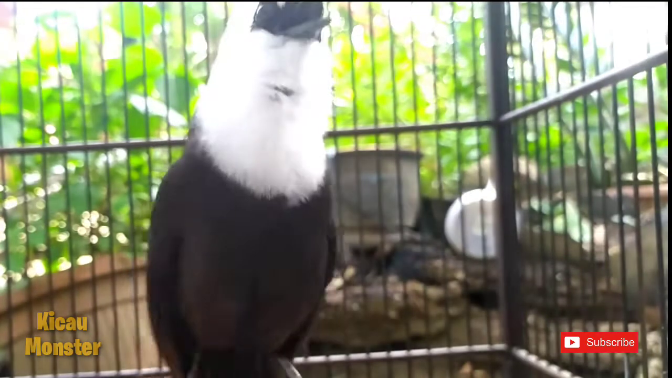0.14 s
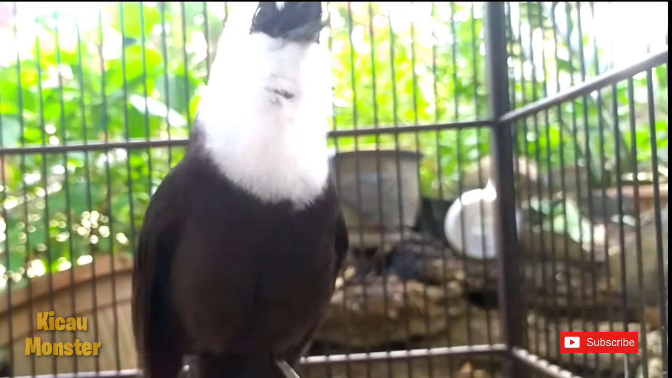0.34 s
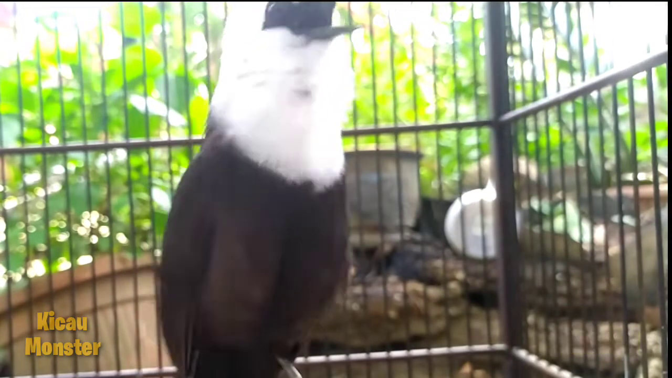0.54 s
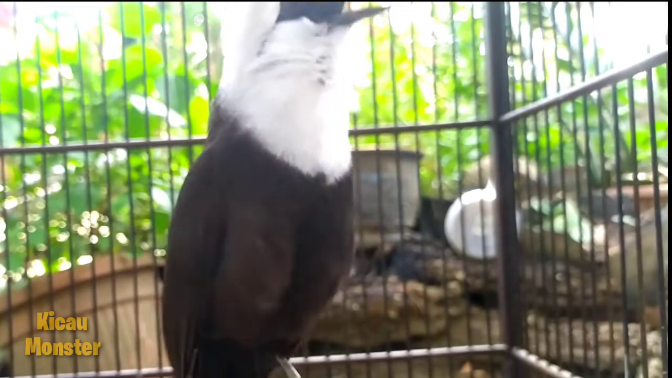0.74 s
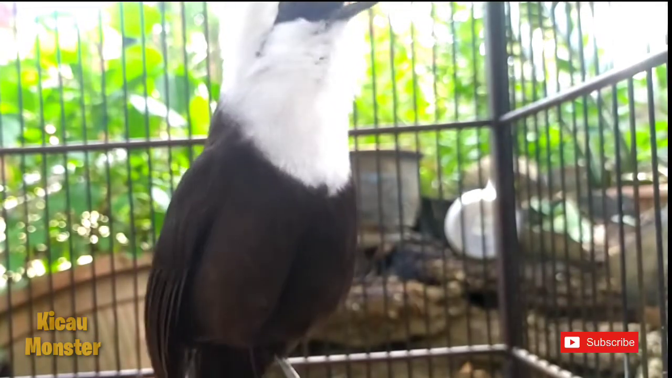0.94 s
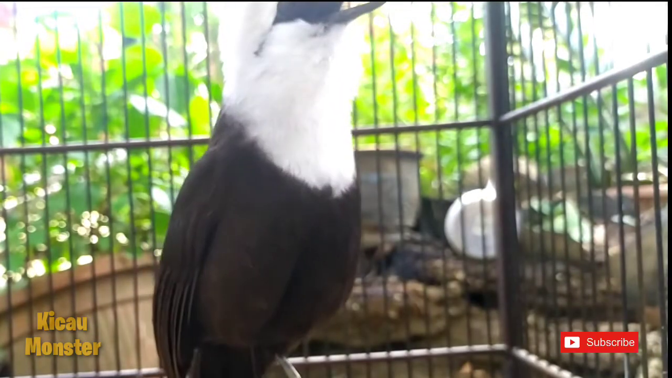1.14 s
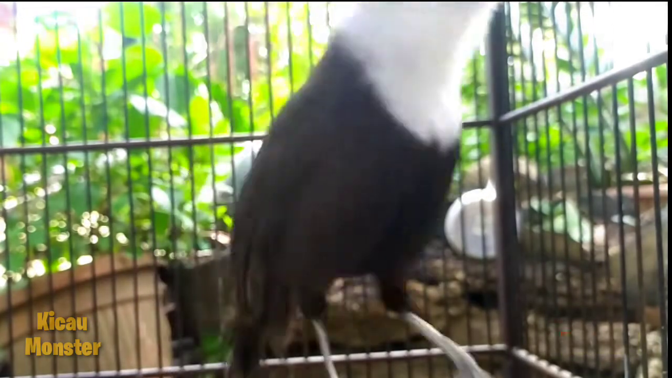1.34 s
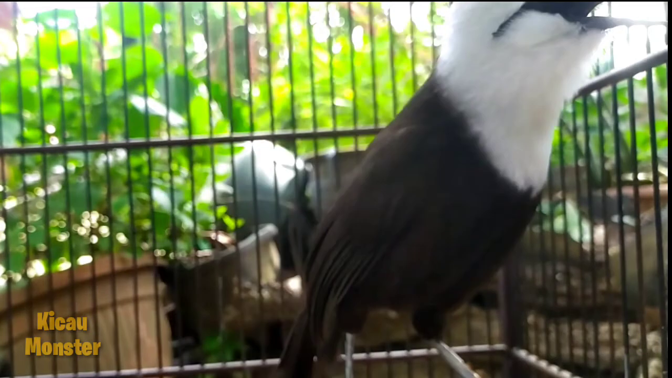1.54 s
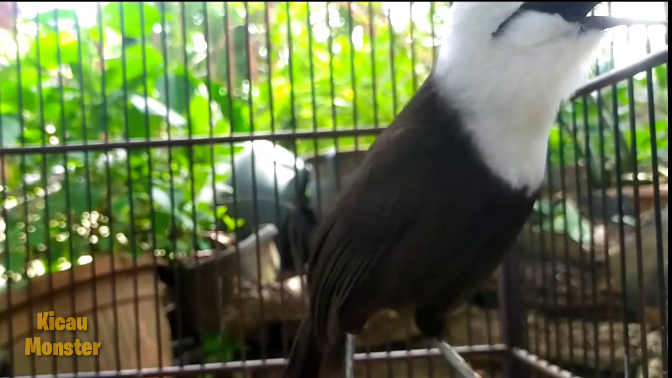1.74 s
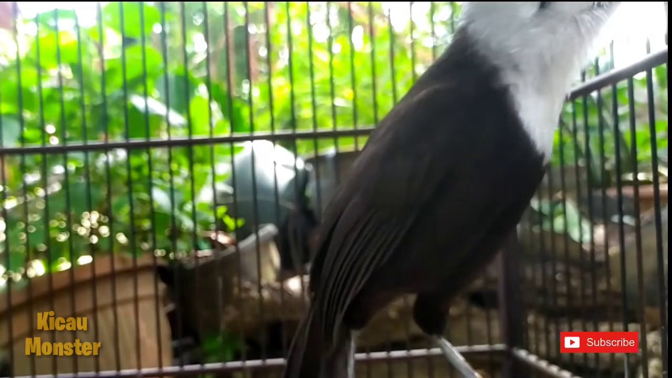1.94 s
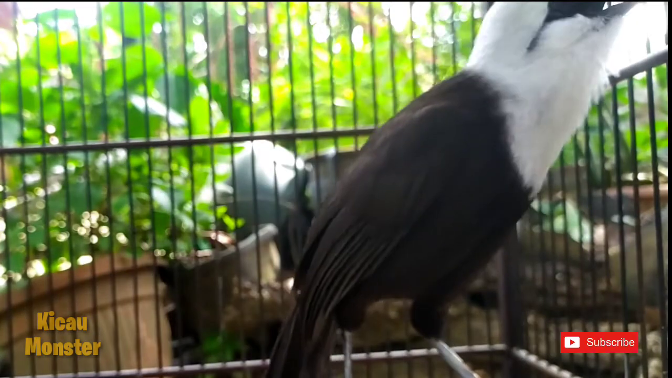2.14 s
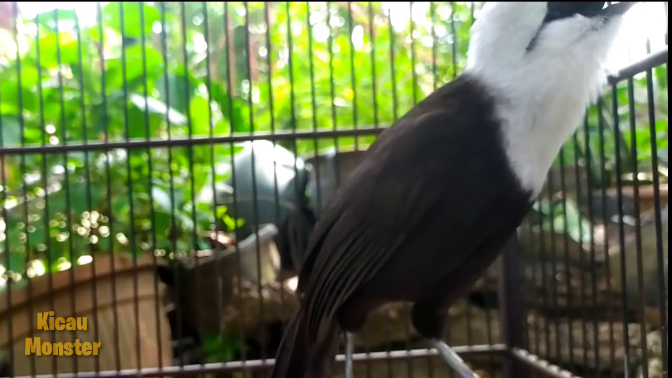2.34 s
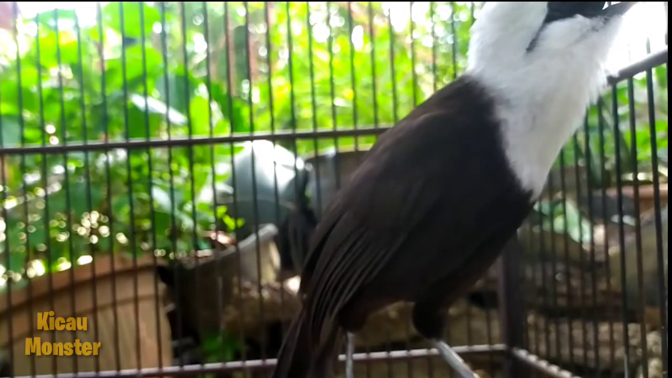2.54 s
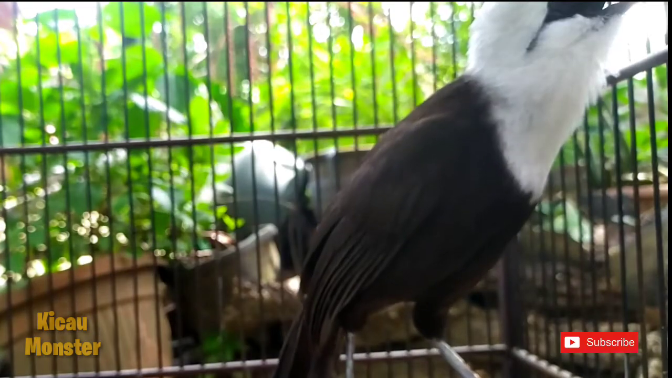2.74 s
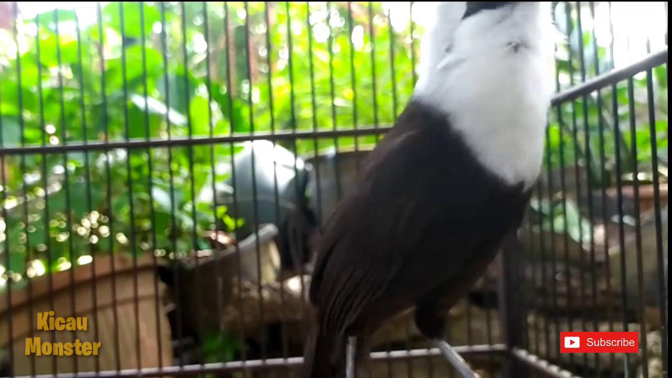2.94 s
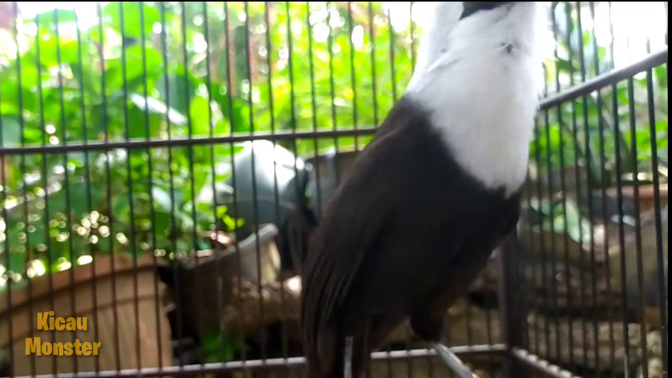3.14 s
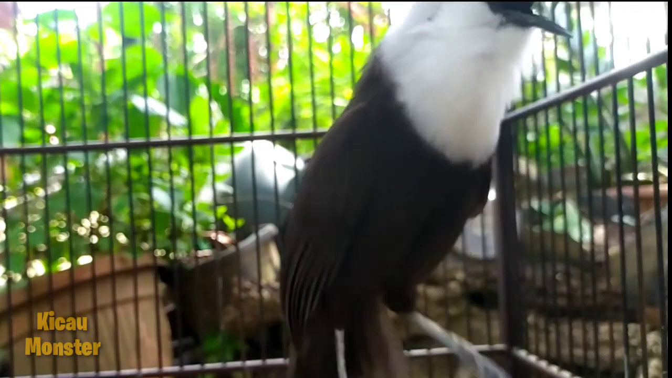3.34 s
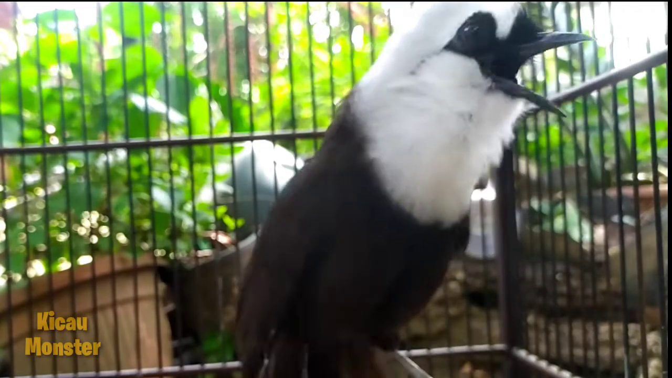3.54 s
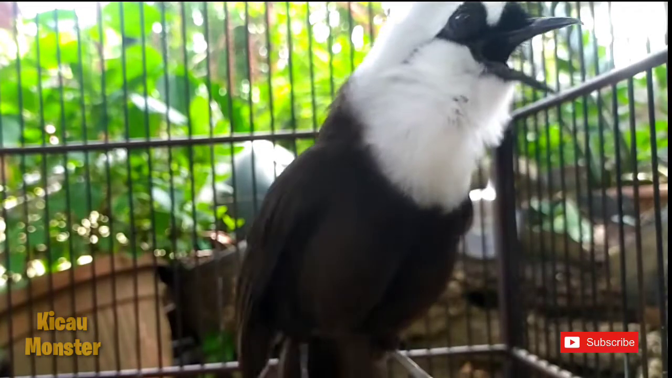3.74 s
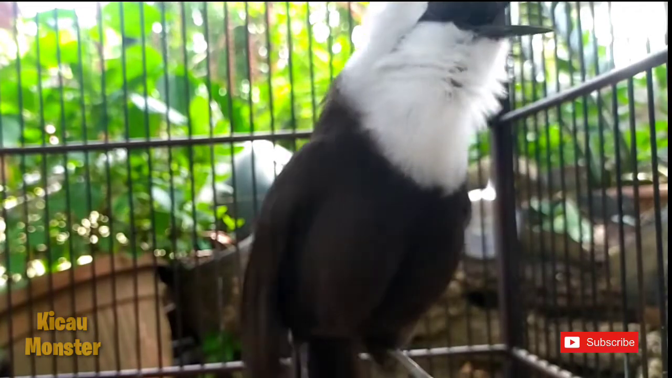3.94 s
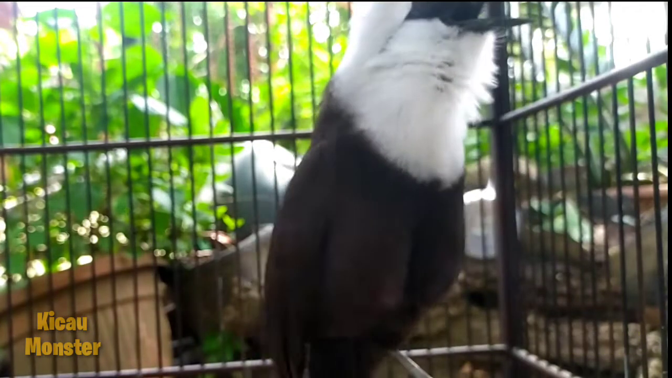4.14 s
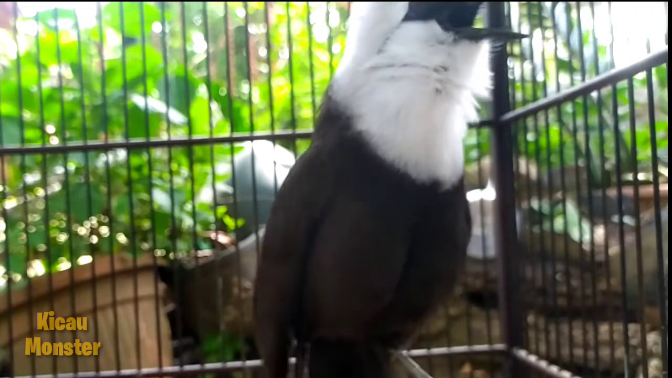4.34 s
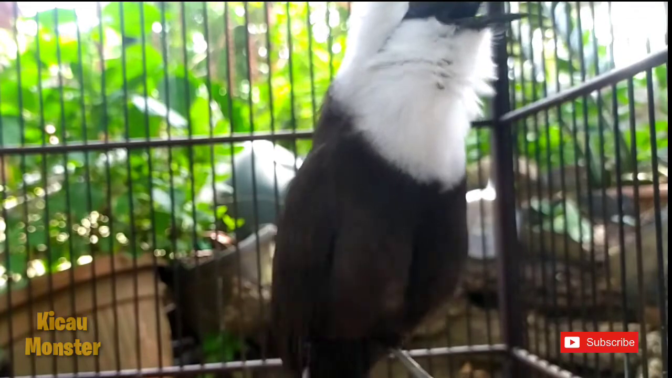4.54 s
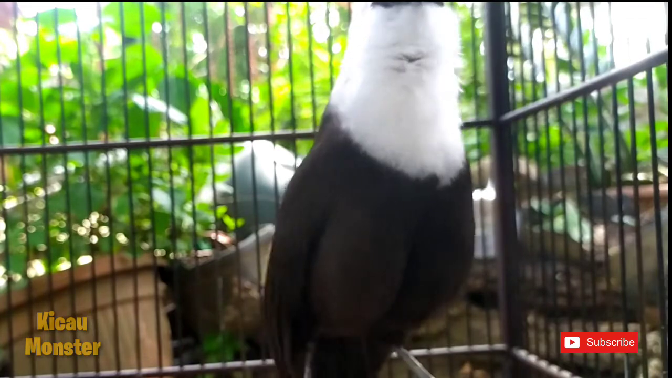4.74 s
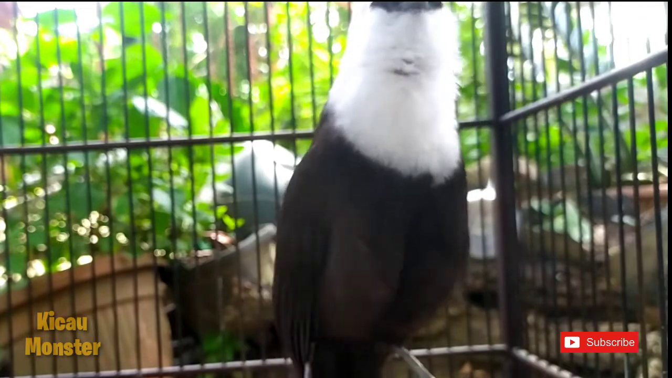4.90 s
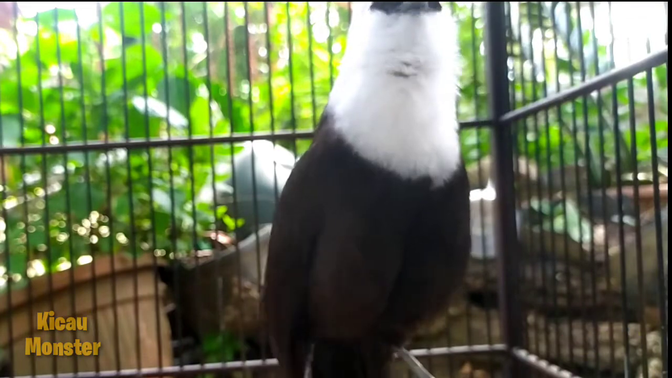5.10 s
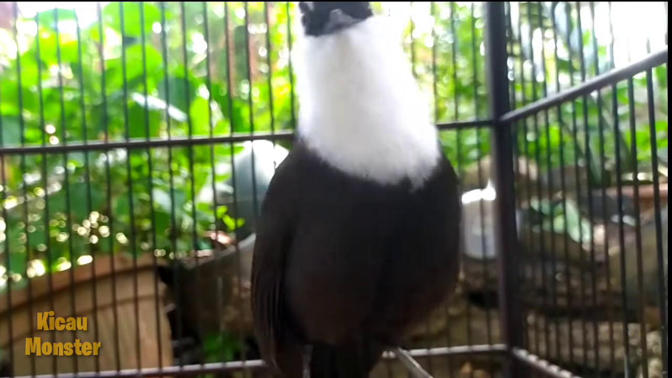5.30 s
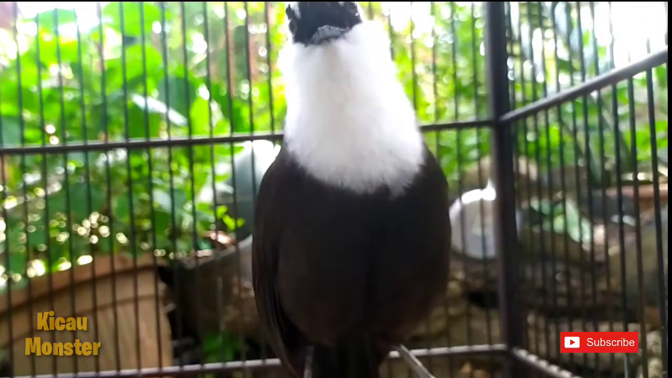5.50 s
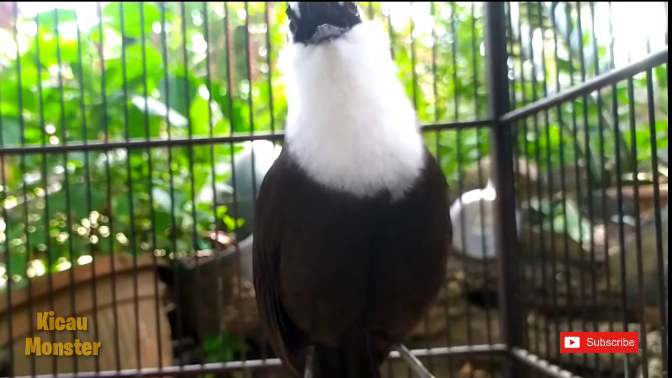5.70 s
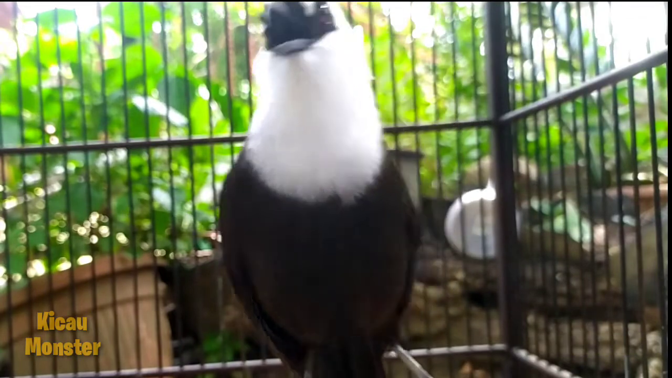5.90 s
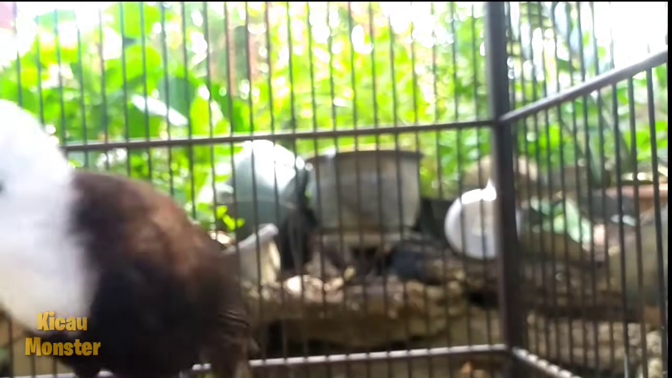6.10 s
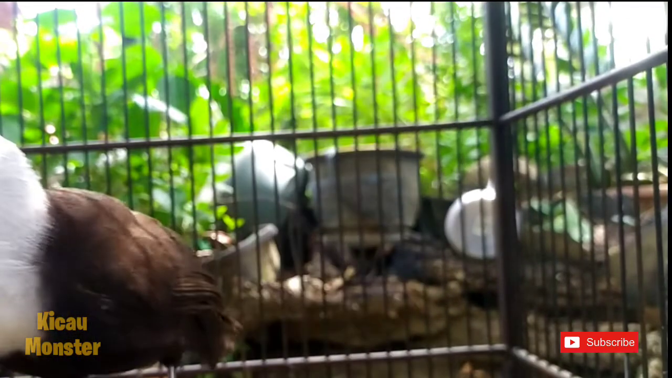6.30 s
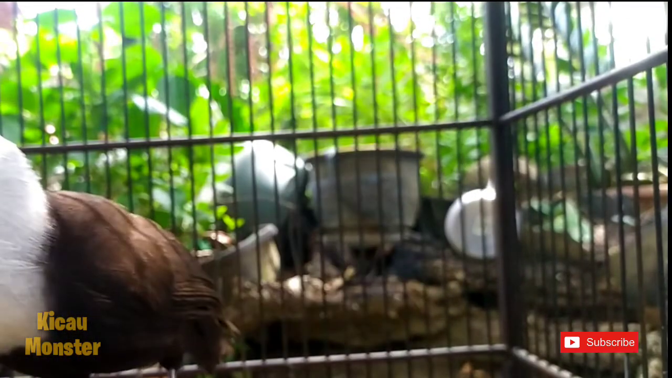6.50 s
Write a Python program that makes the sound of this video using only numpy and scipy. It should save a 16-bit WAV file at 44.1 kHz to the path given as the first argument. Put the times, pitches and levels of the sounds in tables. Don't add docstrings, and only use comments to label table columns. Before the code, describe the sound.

Outdoors in a garden, a large songbird chatters loudly right at the microphone: eleven quick raspy notes, slowing slightly, then a pause with weak echoing sparrow chirps over faint hum and rumble. Quiet stray notes lead to a short wobbling call and over two seconds of dense machine-like rattling, with a bright, slightly overloaded edge. It stops; claws tick, thin low whistles catch and settle, and a rough little squawk ends it.

```python
import sys
import numpy as np
from scipy import signal
from scipy.fft import rfft, irfft, next_fast_len
from scipy.io import wavfile
from scipy.ndimage import uniform_filter1d, map_coordinates

SR = 44100
rng = np.random.default_rng(int(sys.argv[2]) if len(sys.argv) > 2 else 0)


def field_ratio(decibels):
    return 10 ** (np.asarray(decibels, dtype=float) / 20)


def store_pcm(level_fs):
    pcm = np.round(np.clip(level_fs, -1, 1) * 32767).astype(np.int16)
    wavfile.write(sys.argv[1], SR, np.atleast_2d(pcm).T)


N = 293706
TIME = np.arange(N) / SR

# (time [s], level [dB], opening pitch of the ruling partial [Hz])
FIRST_BURST = [(0.01, 0, 1903), (0.085, -3, 1871), (0.161, -0.5, 1868), (0.243, -2, 1848),
               (0.333, -1.5, 1889), (0.413, -1, 1868), (0.496, -2, 1868), (0.582, -3, 1855),
               (0.679, -4, 1849), (0.771, -4.5, 1809), (0.895, -5, 1804)]
# (time [s], level [dB], opening pitch [Hz])
SECOND_BURST = [(3.136, -7, 1831), (3.245, -2.5, 1903), (3.323, -2, 1898), (3.389, -1.5, 1938),
                (3.456, -4.5, 1992), (3.525, -4, 1905), (3.594, -2, 1940), (3.663, -2.5, 1907),
                (3.734, -2, 1879), (3.805, -1.5, 1884), (3.875, -1.5, 1912), (3.945, -1.5, 1855),
                (4.017, -1.5, 1922), (4.089, -1.5, 1889), (4.161, -1.5, 1868), (4.238, -1, 1869),
                (4.314, -0.9, 1876), (4.396, -3, 1816), (4.478, -3, 1817), (4.564, -2.5, 1838),
                (4.654, -2.5, 1858), (4.745, -4, 1888), (4.847, -2, 1902), (4.948, -3.5, 1778),
                (5.063, -2.5, 1825), (5.163, -3.5, 1836), (5.254, -4.5, 1811)]
# (time [s], length [s], level [dB], opening pitch [Hz])
SOFT_NOTES = [(2.508, 0.034, -43, 1792), (2.56, .024, -41.5, 1767), (2.617, 0.023, -38, 1834),
              (2.684, 0.027, -36, 1884), (2.764, .028, -39, 1880), (2.846, 0.025, -34.5, 1841),
              (5.461, .03, -38.5, 1812)]
NOTE_BEND = [(.2, 0), (.63, .27), (.75, 1.05), (.87, .3), (1.0, 0)]
# (share of note, level [dB], rasp [dB], second voice [dB])
NOTE_SWELL = [(-.3, -43, -10, -61.5), (-.2, -27.5, -15, -59.5), (-.06, -20, -11.5, -61.5),
              (.05, 0.5, -30, -60.5), (.72, -1.5, -23.5, -18), (.94, 0, -22.5, -20),
              (1.1, -27, -0.5, -13.5), (1.28, -29, 5.5, -24), (1.5, -53, 0, -47)]
# (time [s], pitch [Hz], level [dB])
LONG_NOTE = [(2.878, 1251, -47), (2.898, 1566, -21), (2.917, 1657, -11), (2.942, 1503, -17.5),
             (2.968, 1583, -12.5), (2.993, 1500, -15), (3.016, 1700, -6.5), (3.027, 1628, -7),
             (3.042, 1250, -39)]
# (frequency [Hz], level [dB])
THROAT = [(700, -30), (1000, -32.5), (2400, -22.5), (3200, -33), (3800, -38), (4700, -37.5), (5600, -19.5),
          (6600, -30), (8400, -35), (9400, -27.5), (10800, -25.5), (12300, -43.5), (14200, -35)]
# (frequency [Hz], density [dB per Hz])
RASP = [(3500, -46), (4600, -10), (5600, 11.5), (7200, -17), (8400, -4), (10200, -1), (12300, -3.5),
        (14200, -7), (16000, -22)]
# (frequency [Hz], density [dB per Hz])
WHEEZE = [(5200, -52.5), (6200, -17), (7100, 5), (8000, -3.5), (9500, -24), (11500, -2.5), (15000, -13),
          (16000, -42)]
# (frequency [Hz], density [dB per Hz])
GRUFF = [(300, -59), (600, -36.5), (1000, -3), (1350, -3), (1900, 6.5), (2800, -4.5), (3800, -12.5),
         (5000, -41)]
# (centre [Hz], width [Hz], depth [0-1])
NOTCHES = [(4300, 190, 0.1), (8385, 150, 1), (12200, 630, 0.8)]
# (time [s], opening [dB], slackness of the throat [dB])
BEAK = [(0, 2.5, 0.64), (.95, 0, -0.6), (2.49, -26, 10), (2.87, -10.5, -5), (2.89, -21, 7.5),
        (3.04, -22, 0.5), (3.13, -19.5, -0.5), (3.27, -6.5, -3.5), (3.45, 4.5, 3), (4.0, 3.5, -0.1),
        (4.6, 1.7, -1.4), (5.3, -1.54, -2), (5.5, 1, -2)]
# (time [s], left lag [samples], left-right [dB])
POSE = [(0, 5.5, -2.8), (.95, 5.5, -2), (2.42, 5, -2.5), (2.49, 20, 3), (2.87, 16, -3), (2.89, 9.5, -8),
        (3.13, 10.5, -1.5), (3.45, 11.5, -6), (4.6, 10.5, -7), (5.3, 7.5, 0), (6.2, 12.5, 0.2),
        (6.595, 11.5, 1.5), (6.6, -3.5, 4)]
# (time [s], length [s], from [Hz], to [Hz], level [dB])
WHISTLES = [(2.15, 0.16, 1496, 1430, -63), (2.294, 0.0956, 1365, 1290, -57.5),
            (5.94, .06, 1370, 1380, -62.5), (6.17, .045, 1246, 1280, -48),
            (6.206, 0.032, 1318, 1290, -39.5), (6.256, .17, 1289, 1314, -40), (6.429, .07, 1353, 1384, -40)]
# (time [s], length [s], from [Hz], to [Hz], level [dB])
HELD_WHISTLE = (6.49, .125, 1394, 1391, -38)
# (time [s], level [dB])
SQUAWK_SWELL = [(6.602, -49), (6.61, -27), (6.63, -15), (6.645, -23.5), (6.66, -37.5)]
# (frequency [Hz], density [dB per Hz])
SQUAWK_COLOUR = [(240, -72), (400, -58), (1010, -8.5), (1760, -12), (2930, -15), (3690, -28), (3990, -27),
                 (4380, -26.5), (5780, -21), (13100, -27.5), (16000, -33)]
# (time [s], pitch [Hz], level [dB])
SQUAWK_SLIDE = [(6.604, 2800, -39), (6.614, 2529, -26.5), (6.62, 2078, -26.5), (6.625, 1250, -18),
                (6.629, 1592, -14.5), (6.634, 2064, -15.5), (6.639, 1571, -22.5), (6.646, 1186, -21.5),
                (6.659, 1000, -40)]
# (time [s], length [s], from [Hz], to [Hz], level [dB])
CHEEPS = [(1.181, 0.017, 4700, 2800, -39.5), (1.324, 0.024, 4930, 2990, -41),
          (2.34, .033, 2560, 3340, -50.5), (2.583, 0.02, 4300, 2790, -44), (6.174, .018, 4610, 2890, -43),
          (6.567, 0.016, 4933, 2980, -42.5)]
# (time [s], length [s], from [Hz], to [Hz], level [dB])
TWEETS = [(1.26, 0.053, 3720, 3710, -61), (1.345, .07, 1640, 1680, -54), (1.415, 0.134, 690, 670, -56),
          (1.42, .047, 3700, 3650, -62), (1.497, .025, 3730, 3710, -54), (1.55, .055, 3720, 3676, -60),
          (2.084, 0.066, 2890, 4065, -53.5), (2.205, 0.028, 2530, 5740, -47),
          (2.292, 0.015, 2690, 6500, -37), (2.427, 0.033, 2806, 7000, -40.5),
          (5.47, 0.074, 8000, 6660, -37), (5.508, .057, 6370, 4300, -49.5), (6.09, .03, 2470, 2570, -55)]
# (time [s], peak level [dB], t60 [s], left-right [dB])
TICKS = [(2.3496, -42.5, 0.025, -8.5), (6.0288, -42, 0.036, -15.5), (6.0464, -46.5, 0.025, 2),
         (6.123, -54, 0.026, -2.5), (6.139, -49, 0.027, -3), (6.1993, -31, 0.021, 6.5),
         (6.244, -44.5, 0.022, -15)]
# (frequency [Hz], density [dB per Hz])
PERCH_COLOUR = [(880, -37), (1500, -6.5), (2060, -18), (3180, -3.5), (5660, -13), (7690, 1.5), (16000, -13)]
# (delay [s], level [dB])
WALLS = [
    [(.0035, -16), (.0075, -15), (.012, -20), (.021, -28.5), (.033, -30.5)],
    [(.003, -57.5), (.008, -21), (.0115, -21.5), (.023, -28.5), (.031, -28.5)],
]
# (frequency [Hz], t60 [s])
GARDEN_DECAY = [(500, 0.51), (2000, 0.42), (6000, 0.64), (12000, 0.227)]
# (frequency [Hz], density [dB per Hz])
TOWN_COLOUR = [(12, -45.5), (20, -13), (49, -3), (134, -1), (210, -8.5), (294, -13.5), (379, -19.5),
               (448, -13.5), (501, -19.5), (807, -19.5), (1670, -26.5), (2840, -27), (8970, -31),
               (14800, -33), (16200, -52)]
# (frequency [Hz], left-right likeness [0-1])
TOWN_LIKENESS = [(30, 0.71), (125, 0.81), (300, 0.4), (1000, 0.22), (4000, 0.041)]
# (frequency [Hz], level [dB])
HUMS = [(59, -61.5), (301, -69.5), (667, -77)]


def unit(x):
    return x / np.sqrt(np.mean(x ** 2) + 1e-20)


def along(points, hz):
    f, v = np.transpose(points)
    return np.interp(np.log(hz + 1), np.log(f + 1), v)


def curves(rows, at=TIME):
    places, *columns = np.transpose(rows)
    return [np.interp(at, places, column) for column in columns]


def wobble(rate):
    return map_coordinates(rng.standard_normal(int(N * rate / SR) + 4), [TIME * rate])


def tone(hz):
    return np.sin(2 * np.pi * np.cumsum(hz) / SR)


def filtered(x, response):
    m = next_fast_len(N + 8192)
    return irfft(rfft(x, m) * response(np.fft.rfftfreq(m, 1 / SR)), m)[..., :N]


def hiss(colour):
    return unit(filtered(rng.standard_normal(N), lambda hz: field_ratio(along(colour, hz))))


def port_hiss(colour, shared, own):
    return shared * hiss(colour) + own * np.array([hiss(colour), hiss(colour)])


def chatter():
    note_s, soft_climb_hz = .0303, 129.7
    quick_gap_s, quick_top_hz, slow_top_hz, sag_hz_per_s = .074, 2161.5, 1940, 6000
    notes = [(s, length, db, hz, hz + soft_climb_hz) for s, length, db, hz in SOFT_NOTES]
    for burst, first_gap in ((FIRST_BURST, .07), (SECOND_BURST, .12)):
        gaps = np.diff([row[0] for row in burst], prepend=burst[0][0] - first_gap)
        tops = np.clip(quick_top_hz - sag_hz_per_s * (gaps - quick_gap_s), slow_top_hz, quick_top_hz)
        notes += [(s, note_s, db, hz, top) for (s, db, hz), top in zip(burst, tops)]
    return notes


def gesture():
    hz, db = curves(LONG_NOTE)
    db[(TIME < LONG_NOTE[0][0]) | (TIME > LONG_NOTE[-1][0])] = -120
    rasp_db, held_hz, held_db = np.full(N, -29.), np.full(N, 1850.), np.full(N, -120.)
    for s, length, level_db, opening_hz, top_hz in chatter():
        part = slice(max(round((s - .3 * length) * SR), 0), round((s + 1.5 * length) * SR))
        share = (TIME[part] - s) / length
        sag = -.8 * np.maximum(.08 - share, 0) - .94 * np.maximum(share - .85, 0)
        climb, = curves(NOTE_BEND, share)
        swell_db, rasp_db[part], second_db = curves(NOTE_SWELL, share)
        hz[part] = opening_hz * (1 + sag) + climb * (top_hz - opening_hz)
        db[part] = level_db + 1.5 + swell_db
        held_hz[part] = opening_hz * (1.04 - .05 * share)
        held_db[part] = level_db + 1.0 + second_db
    return hz, db, rasp_db, held_hz, held_db


def syrinx(beat_hz, phase, open_db, slack_db):
    voice = np.array([np.sin(2 * phase)] * 2) * field_ratio(.4 * wobble(200))
    rattling = (TIME > LONG_NOTE[0][0]) & (TIME < LONG_NOTE[-3][0])
    voice *= 1 + rattling * .55 * np.cos(.4 * phase + 1.6 * wobble(150))
    for k in (1, *range(3, 17)):
        steady = k in (1, 4) or k % 4 == 2
        gain_db = along(THROAT, k * beat_hz) + (open_db if k > 5 else slack_db)
        gain_db += 3 if steady else -4
        spread = .4 if steady or k == 3 else min(.45 + .09 * k, 1.2)
        scatter = np.array([wobble(250), wobble(250)]) * spread
        partial = np.sin(k * phase + rng.uniform(0, 2 * np.pi) + scatter)
        voice += field_ratio(gain_db + 5.1 * scatter[::-1]) * partial
    return voice


def breath(phase, open_db, slack_db):
    wheeze_db = -1 - .8 * open_db
    rasp = field_ratio(1.4 * open_db - 4.0) * port_hiss(RASP, 1.1, 1.1)
    wheeze = field_ratio(wheeze_db - 5.5) * port_hiss(WHEEZE, .97, .38)
    gruff = field_ratio(.52 * slack_db - 1.0) * port_hiss(GRUFF, .87, 1.09)
    return (gruff + rasp + wheeze) * (1 + .5 * np.cos(phase)) * field_ratio(2.3 * wobble(150))


def second_voice(held_hz, held_db, open_db):
    phase = 2 * np.pi * np.cumsum(held_hz * (1 + .02 * wobble(400))) / SR
    odd = field_ratio(open_db - 9.5) * np.sin(3 * phase) + field_ratio(open_db - 25.0) * np.sin(5 * phase)
    return field_ratio(held_db + .88 * wobble(200)) * (np.sin(phase) + odd)


def narrow_dips(hz):
    dips = [1 - min(depth, .98) / (1 + ((hz - centre) / width) ** 2) for centre, width, depth in NOTCHES]
    return np.prod(dips, axis=0)


def thrush():
    hz, db, rasp_db, held_hz, held_db = gesture()
    open_db, slack_db = curves(BEAK)
    beat_hz = hz / 2 * (1 + .007 * wobble(600))
    phase = 2 * np.pi * np.cumsum(beat_hz) / SR
    voice = syrinx(beat_hz, phase, open_db, slack_db)
    air = field_ratio(rasp_db) * breath(phase, open_db, slack_db)
    sung = field_ratio(db) * (db > -90) * (voice + air)
    return filtered(sung + second_voice(held_hz, held_db, open_db), narrow_dips)


def whistles():
    out, edge_s = np.zeros(N), .011
    for (s, length, from_hz, to_hz, db), ease in [(row, .7) for row in WHISTLES] + [(HELD_WHISTLE, 4)]:
        hz = np.interp(TIME, [s, s + length], [from_hz, to_hz])
        edge = np.clip(np.minimum(TIME - s, s + length - TIME) / edge_s, 0, 1)
        catching = np.tanh(2.5 * np.abs(wobble(90) + ease))
        out += edge * field_ratio(db + 1.5) * catching * tone(hz)
    return out


def squawk():
    hz, db = curves(SQUAWK_SLIDE)
    slide = (TIME > SQUAWK_SLIDE[0][0]) * field_ratio(db) * tone(hz)
    beats = 1 + .12 * tone_cos(520 * (1 + .15 * wobble(200)))
    swell = (TIME > SQUAWK_SWELL[0][0]) * field_ratio(curves(SQUAWK_SWELL)[0] - 2.5)
    return slide + swell * unit(hiss(SQUAWK_COLOUR) * beats)


def tone_cos(hz):
    return np.cos(2 * np.pi * np.cumsum(hz) / SR)


def perch():
    out, t, grit = np.zeros((2, N)), np.arange(SR // 10) / SR, hiss(PERCH_COLOUR)
    for s, db, t60, pan_db in TICKS:
        part = slice(round(s * SR), round(s * SR) + len(t))
        pan = [[pan_db / 2], [-pan_db / 2]]
        out[:, part] += field_ratio(db - 5.5 - 60 * t / t60 + pan) * grit[part]
    return out


def sparrows():
    out, buzz = np.zeros(N), wobble(900)
    calls = [(*row, .5) for row in CHEEPS] + [(*row, -15) for row in TWEETS]
    for s, length, from_hz, to_hz, db, overtone_db in calls:
        share = np.arange(round(length * SR)) / (length * SR)
        part = slice(round(s * SR), round(s * SR) + len(share))
        glide = from_hz * (to_hz / from_hz) ** share
        phase = 2 * np.pi * np.cumsum(glide + .115 * abs(to_hz - from_hz) * buzz[part]) / SR
        resonance = 1 + 2.2 / (1 + ((glide - 4450) / 350) ** 2)
        call = np.sin(phase) * resonance + field_ratio(overtone_db) * np.sin(1.9 * phase)
        out[part] += field_ratio(db) * np.sin(np.pi * share ** .83) * call
    return out


def at_ports(bird):
    lag, pan_db = curves(POSE)
    ports = []
    for v, side in zip(bird, (1, -1)):
        delayed = map_coordinates(v, [np.arange(N) - side * lag / 2], order=3)
        ports.append(field_ratio(side * pan_db / 2) * delayed)
    return np.array(ports)


def walls(bird):
    out = np.zeros((2, N))
    for port, v, echoes in zip(out, bird, WALLS):
        for delay, db in echoes:
            late = round(delay * SR)
            port[late:] += field_ratio(db) * v[:N - late]
    return out


def garden(x, size):
    turn, out = (TIME / .075).astype(int) % 3, 0
    for k in range(3):
        hz, t, z = signal.stft(rng.standard_normal((2, SR // 2)), SR, nperseg=256)
        decay = field_ratio(-60 * t / (size * along(GARDEN_DECAY, hz)[:, None]))
        tail = signal.istft(z * decay, SR, nperseg=256)[1]
        share = uniform_filter1d(1. * (turn == k), size=400)
        sent = np.pad(x * share, (300, 0))[None]
        out = out + signal.fftconvolve(sent, tail / np.linalg.norm(tail[0]), axes=1)[:, :N]
    return out


def town():
    z = signal.stft(rng.standard_normal((2, N)), nperseg=512)[2]
    patches = uniform_filter1d(rng.standard_normal(z.shape[1:]), size=6, axis=0)
    patches = uniform_filter1d(patches, size=14, axis=1)
    pair = signal.istft(z * field_ratio(.82 * unit(patches)), nperseg=512)[1][:, :N]

    def mid_side(hz):
        turn = np.arccos(np.clip(along(TOWN_LIKENESS, hz), -1, 1)) / 2
        return field_ratio(along(TOWN_COLOUR, hz)) * [np.cos(turn), np.sin(turn)]

    mid, side = filtered(pair, mid_side)
    out = field_ratio(-53 + .5 + .2 * wobble(14.0)) * unit(np.array([mid + side, mid - side]))
    for hz, db in HUMS:
        out += field_ratio(db + 4.5 + 2.34 * wobble(36)) * np.sin(2 * np.pi * hz * TIME + .42 * wobble(6.7))
    return out


def scene():
    bird, far = thrush() + whistles() + squawk(), sparrows()
    near = at_ports(bird) + walls(bird) + field_ratio(-19.5) * garden(bird[0], .89)
    distant = field_ratio(-9.5) * far + field_ratio(-5.5) * garden(far, .53)
    return near + perch() + distant + town()


def roll_off(x):
    return signal.sosfilt(signal.butter(12, 16300, fs=SR, output="sos"), x)


def record(dry):
    level = np.sqrt(2 * np.abs(uniform_filter1d(dry ** 2, size=220)))
    limited = dry / (1 + (level / .75) ** 8) ** (1 / 8)

    def band(hz):
        return field_ratio(-.03 * np.maximum(hz - 15300, 0)) * hz ** 4 / (hz ** 4 + 34. ** 4)

    mix = filtered(np.clip(limited, -.9, .9), band)
    return roll_off(mix)


dry = scene()
out = record(dry)
store_pcm(out)
```